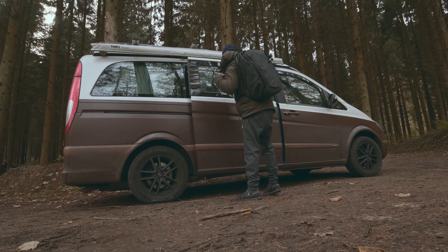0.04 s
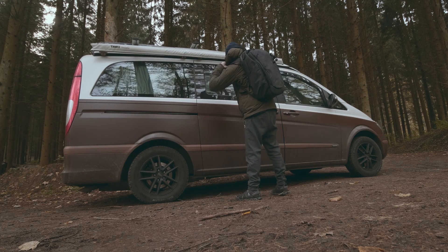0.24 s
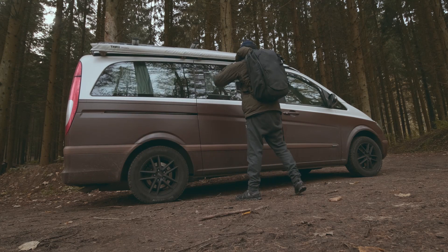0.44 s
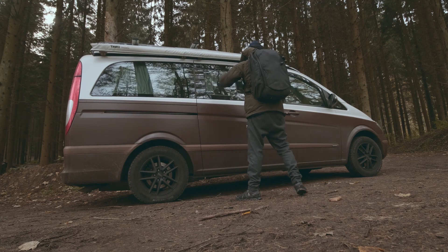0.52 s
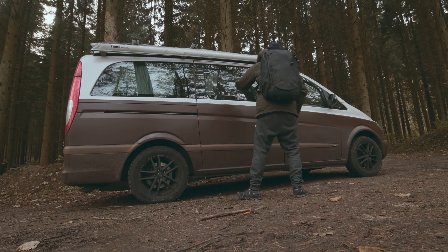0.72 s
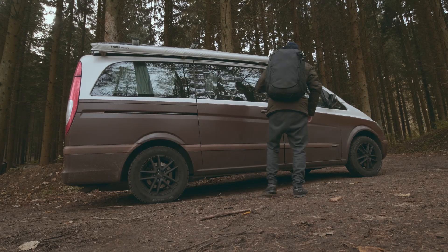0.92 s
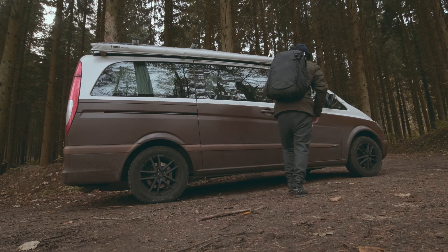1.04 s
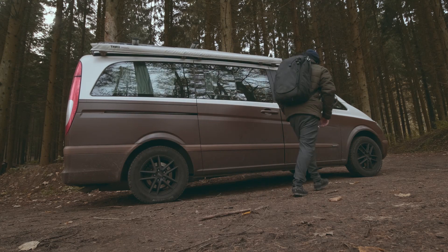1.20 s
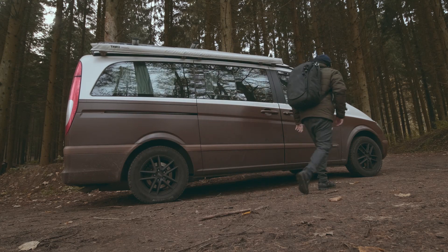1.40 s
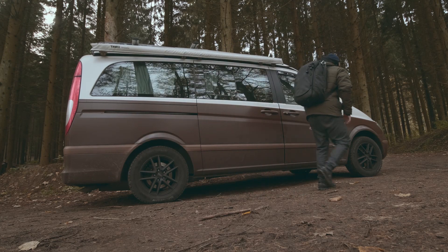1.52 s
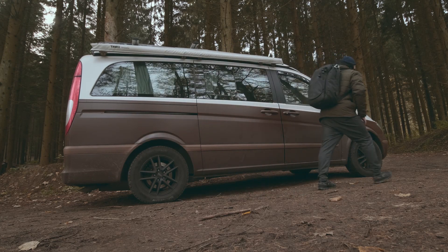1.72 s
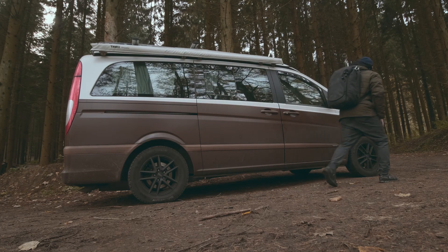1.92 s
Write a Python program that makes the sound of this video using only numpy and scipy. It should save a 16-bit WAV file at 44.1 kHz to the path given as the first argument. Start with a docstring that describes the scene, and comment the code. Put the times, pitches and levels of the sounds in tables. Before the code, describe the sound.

A van's sliding door rolls and slams shut, then faint footsteps cross dry forest litter.

```python
"""A van's side door rumbles along its rail on rollers, then slams in a still forest. The steel
panel booms against its frame, the latch snaps and rattles, and the pushed cabin air thuds.
Someone walks off over dry litter: soft footfalls, crackling scuffs and small twig snaps.
The trunks scatter a thin echo; under it all lie a faint hush of trees and a low wind rumble."""
import sys
import numpy as np
from scipy import signal
from scipy.fft import rfft, irfft
from scipy.io import wavfile
from scipy.ndimage import uniform_filter1d

SR = 44100
rng = np.random.default_rng(int(sys.argv[2]) if len(sys.argv) > 2 else 0)


def int16_out(signal):
    """Quantize to a 16-bit WAV file."""
    q = np.round(np.clip(np.atleast_2d(signal).T, -1, 1) * 32767)
    wavfile.write(sys.argv[1], SR, q.astype(np.int16))


N = 85995

# hush of the trees: (frequency [Hz], relative density [dB])
HUSH_COLOUR = [(60, 6.5), (150, 1.5), (230, 3.5), (330, 3), (600, -1.5), (1200, 0.5), (2000, -7),
               (3300, -8.5), (4100, -12.5), (5200, -17), (6500, -21.5), (11000, -21.5), (15000, -22)]
# wind rumble: (frequency [Hz], relative density [dB])
WIND_TONE = [(4, -9), (12, 13.5), (25, -8.5), (48, -2.5), (75, -7.5), (110, -34), (200, -29.5), (600, -136)]
# gusts: (time [s], level [dB])
GUSTS = [(0.5, -44), (0.544, -34), (0.802, -47.5), (0.854, -60), (0.916, -38), (0.956, -62), (0.996, -38),
         (1.056, -42), (1.096, -38.5), (1.166, -49), (1.25, -35), (1.314, -44), (1.368, -40), (1.73, -42),
         (1.836, -36), (1.95, -51)]
# echo off the trunks: (frequency [Hz], relative density [dB], t60 [s])
FOREST_TAIL = [(95, 19, 0.65), (410, -2, 0.54), (1200, -1.5, 0.58), (3160, -2.5, 0.69), (6850, -0.5, 0.59),
               (14400, -1, 0.26)]
# soles on soft ground: (time [s], level [dB], pitch [Hz], t60 [s])
STEPS = [(.983, -26.5, 48.7, 0.18), (1.072, -24.5, 46.3, 0.17), (1.365, -28, 42, 0.17)]
# shoes and clothing: (peak time [s], rise [s], fall [s], level [dB], tilt [dB/octave])
SCUFF_SWELLS = [(.04, 0.082, 0.045, -45.5, -2.5), (.135, 0.0055, 0.0072, -53, -4),
                (0.533, 0.024, 0.077, -50.5, -2), (.77, 0.091, 0.12, -50, -2),
                (1.29, 0.14, 0.13, -54, -1.5), (1.419, 0.038, 0.034, -50.5, -1),
                (1.535, .008, 0.011, -51.5, -6.5), (1.62, 0.07, 0.074, -58, 0.5),
                (1.797, 0.015, 0.016, -46, -2.5), (1.801, 0.014, 0.033, -48, 3),
                (1.899, .04, 0.061, -55.5, -1.5)]
# crackle of dry litter: (frequency [Hz], relative density [dB])
LITTER_COLOUR = [(40, -22), (150, -3), (400, 2), (1200, 0), (2200, -1), (3150, 3), (4000, -4), (5000, 0),
                 (6500, -10), (11000, -12), (15000, -18)]
# twigs and grit: (time [s], ring gain [dB], pitch [Hz], t60 [s], tick gain [dB])
TWIG_SNAPS = [(1.2298, -54, 4800, .005, -33), (1.2345, -51, 3500, 0.0055, -33),
              (1.2651, -44, 4570, 0.0038, -20), (1.269, -40, 2760, .005, -38),
              (1.31, -51.5, 3340, 0.057, -62), (1.397, -39, 2300, 0.012, -29.5),
              (1.426, -37.5, 2760, 0.013, -55), (1.798, -47.5, 4635, 0.08, -30),
              (1.919, -32, 4780, .013, -37)]
# ring of a twig: (frequency [multiple of its pitch], relative level [dB])
TWIG_MODES = [(.43, -5), (0.499, -8.5), (.88, -4), (.98, 0.5), (1.09, 0)]
# tick of a breaking fibre: (frequency [Hz], relative level [dB], t60 [s])
TICK_MODES = [(1840, -17.5, .004), (4700, 0.5, 0.0009), (8800, -15, 0.0011)]
# pushes of cabin air: (time [s], level [dB], pitch [Hz], t60 [s])
CABIN_THUDS = [(0.212, -6, 38.4, 0.32), (0.253, -0.5, 45, 0.086), (0.2669, -1, 117, 0.043),
               (0.297, -13, 52.4, 0.18)]
# drone of the hollow body: (frequency [Hz], level [dB], t60 [s])
CABIN_MODES = [(110, -28, .5), (128, -32, .45), (150, -29, .62), (163, -37, .45)]
# envelope of the rollers: (time [s], relative level [dB])
ROLL_ENVELOPE = [(0.0, -22), (0.044, -25.5), (0.064, -26.5), (0.102, -25), (0.184, -30), (0.19, -25.5)]
# roller rumble: (frequency [Hz], relative density [dB])
ROLL_TONE = [(40, -13), (90, -16.5), (170, 2), (330, -14), (500, -14.5), (780, -13), (1000, -26.5),
             (1250, -24), (1750, -38), (3200, -35.5), (5000, -48), (7000, -63), (15000, -64)]
# rail and door under the rollers: (frequency [Hz], relative level [dB], t60 [s])
RAIL_MODES = [(147.8, 8.5, 0.35), (160, -12, 0.18), (186, 0, 0.36), (228, -39, .1), (319, -1, 0.39),
              (590, -41, 0.089), (740, -41, 0.12), (1108, 1, 0.15)]
# latch strikes: (time [s], gain [dB], tilt [dB/octave])
LATCH_STRIKES = [(.2142, -26.5, -22), (.2165, -19, 4), (.2188, -24, 1.5), (0.2272, -27, 4), (0.249, -31, 6),
                 (0.2536, -22, -2), (.269, -38, 1), (.3022, -31, -3), (0.3255, -28.5, -9.5)]
# dense ring of latch steel: (frequency [Hz], relative density [dB], t60 [s])
STEEL_RING = [(150, -38, 0.063), (700, -19, 0.12), (1890, 4, 0.11), (3560, 4, 0.058), (3980, -0.5, 0.041),
              (5000, 3.5, 0.049), (6150, -9.5, 0.047), (9850, -11.5, .055), (15000, -23.5, 0.054)]
# clear notes of the catch: (frequency [Hz], relative level [dB], t60 [s])
CATCH_MODES = [(2194, -24.5, 0.046), (2690, -16, 0.026), (3458, -22.5, 0.084), (4800, -19, 0.078),
               (5590, -26, 0.062), (8170, -21, 0.056), (9970, -22, .04)]
# door on frame: (time [s], panel gain [dB], clatter gain [dB], tilt [dB/octave], seal t60 [s])
DOOR_BLOWS = [(0.204, -11, -10, 1, 1), (0.2097, -28.5, -16.5, 0, 1.2), (0.219, -21, -12.5, -2, 0.13),
              (0.2548, -28, -12.5, 0, 0.43), (.271, -30, -17.5, 0, 0.8), (.301, -33.5, -14.5, -2.5, 0.49),
              (0.311, -45, -17.5, -3, 0.27), (0.3278, -27, -12.5, -3, 0.075), (0.357, -39, -26, -4, 0.89)]
# boom of the panel: (frequency [Hz], relative level [dB], t60 without seals [s])
PANEL_MODES = [(183.2, -8, 0.94), (218, -0.5, 0.11), (331.8, -8, 0.79), (374.2, -9.5, 0.62),
               (478.2, -4, 0.18), (503, -5, 0.053), (566, -7.5, 0.25), (670, -17, 0.26), (750, -5, .2),
               (939, 5.5, 0.061), (1048, -4.5, 0.15), (1130, 4.5, 0.075), (1322, 5, 0.053),
               (1681, -9, 0.059)]
# clatter of the bodywork: (frequency [Hz], relative density [dB], t60 without seals [s])
BODY_RING = [(40, -28, 0.23), (103.4, -1.5, 0.31), (243, 0.5, .16), (540, 4, 0.15), (800, -1.5, 0.21),
             (1430, -2, 0.19), (1890, -26, 0.15), (3200, -25, 0.37), (6050, -39, 0.14), (15000, -58, 0.062)]

TIME = np.arange(N) / SR
BIN_OCTAVES = np.log2(np.fft.rfftfreq(N, 1 / SR) + 1)


def amp(db):
    """Decibels to gain."""
    return 10 ** (np.asarray(db) / 20)


def unit(x):
    """Scales to rms 1."""
    return x / np.sqrt(np.mean(x ** 2) + 1e-20)


def attack(rise_s):
    """A fade-in with time constant rise_s."""
    return 1 - np.exp(-TIME / rise_s)


def decay(t60):
    """An exponential fall of 60 dB in t60 seconds."""
    return np.exp(-np.log(1000) * TIME / t60)


def add(mix, start_s, sound):
    """Mixes a sound in at its cue."""
    part = mix[round(start_s * SR):]
    part += sound[:len(part)]


def colour(x, points, tilt_db=0):
    """EQs x to a curve, tilted by tilt_db per octave, at rms 1."""
    table = np.array(points)
    octaves = np.log2(table[:, 0])
    curve_db = np.interp(BIN_OCTAVES, octaves, table[:, 1] + tilt_db * octaves)
    return unit(irfft(rfft(x) * amp(curve_db), N))


def ring(table, tilt_db=0):
    """Countless close resonances: a noise burst whose bands die at their own speeds."""
    spectrum = rfft(colour(rng.standard_normal(N), table, tilt_db))
    hz, _, t60s = np.transpose(table)
    bands = [np.interp(BIN_OCTAVES, np.log2(hz), peak) for peak in np.eye(len(table))]
    return sum(irfft(spectrum * band, N) * decay(t60) for band, t60 in zip(bands, t60s))


def modes(table, tilt_db=0, wave=np.sin):
    """Decaying sines, tilted about the middle of the set."""
    middle = np.mean([np.log2(row[0]) for row in table])
    return sum(amp(db + tilt_db * (np.log2(hz) - middle)) * decay(t60) * wave(2 * np.pi * hz * TIME)
               for hz, db, t60 in table)


def grains(per_s, spread_db):
    """Random tiny impacts of uneven size."""
    hits = (rng.random(N) < per_s / SR) * rng.choice([-1, 1], N)
    return hits * amp(spread_db * np.minimum(rng.exponential(1, N), 4))


def thumps(table, rise_cycles=0.39):
    """Soft, deep pushes of air, each a quickly dying sine."""
    out = np.zeros(N)
    for start, db, hz, t60 in table:
        add(out, start, -attack(rise_cycles / hz) * modes([(hz, db, t60)]))
    return out


def air(hush_db=-52.5):
    """The bed: an even hush of trees and a lumpy wind rumble."""
    hush = amp(hush_db) * colour(rng.standard_normal(N), HUSH_COLOUR)
    gusts = amp(np.interp(TIME, *np.transpose(GUSTS)))
    return hush + gusts * colour(rng.standard_normal(N), WIND_TONE)


def forest_echo(x, wet_db=-21):
    """The trunks scatter a thin reverb tail."""
    tail = ring(FOREST_TAIL) * attack(rise_s=0.021)
    return amp(wet_db) * signal.fftconvolve(x, tail / np.linalg.norm(tail))[:N]


def footfalls():
    """Soles land on soft ground with a dull thump."""
    return thumps(STEPS)


def scuffs():
    """Swells of fine crackle from shoes on needles and from clothing."""
    out = np.zeros(N)
    for peak, rise, fall, db, tilt_db in SCUFF_SWELLS:
        width = np.where(TIME < peak, rise, fall)
        swell = amp(db) * np.exp(-((TIME - peak) / width) ** 2)
        out += swell * colour(grains(per_s=12000, spread_db=2.5), LITTER_COLOUR, tilt_db)
    return out


def snaps():
    """Twigs and grit break with a dry tick and a short woody ring."""
    out = np.zeros(N)
    for start, db, hz, t60, tick_db in TWIG_SNAPS:
        wood = modes([(hz * ratio, db + level, t60) for ratio, level in TWIG_MODES])
        add(out, start, amp(tick_db) * modes(TICK_MODES) + attack(rise_s=0.0004) * wood)
    return out


def rollers(rumble_db=-1.5, drone_db=-12, stop_s=0.199, release_s=0.02):
    """Small bumps of the rail shake the door until it reaches the frame."""
    bumps = grains(per_s=1000, spread_db=3.5)
    rumble = colour(grains(per_s=14000, spread_db=3.5), ROLL_TONE)
    drone = unit(irfft(rfft(bumps) * rfft(modes(RAIL_MODES, wave=np.cos)), N))
    level = amp(np.interp(TIME, *np.transpose(ROLL_ENVELOPE)))
    release = np.exp(-np.maximum(TIME - stop_s, 0) / release_s)
    return level * release * (amp(rumble_db) * rumble + amp(drone_db) * drone)


def cabin(drone_start_s=0.26):
    """The slam's low end: trapped air thuds, and the hollow body drones on."""
    out = thumps(CABIN_THUDS)
    add(out, drone_start_s, attack(rise_s=0.008) * modes(CABIN_MODES))
    return out


def latch(chatter_rms_db=2, chatter_s=0.00085):
    """The slam's bright edge: steel catches strike, chatter and ring."""
    out = np.zeros(N)
    for start, db, tilt_db in LATCH_STRIKES:
        chatter = unit(uniform_filter1d(rng.standard_normal(N), round(chatter_s * SR)))
        rattle = amp(chatter_rms_db * chatter) * ring(STEEL_RING, tilt_db)
        add(out, start, amp(db) * (rattle + modes(CATCH_MODES, tilt_db)))
    return out


def door_slam():
    """The panel hits the frame, is pulled home and rocks; the seals damp it."""
    out = np.zeros(N)
    for start, panel_db, clatter_db, tilt_db, seal_t60 in DOOR_BLOWS:
        boom = amp(panel_db) * modes(PANEL_MODES, tilt_db)
        clatter = amp(clatter_db) * ring(BODY_RING, tilt_db)
        add(out, start, attack(rise_s=0.0011) * decay(seal_t60) * (boom + clatter))
    return out


def scene():
    """The mono mix: door and litter feed the echo; cabin, footfalls and bed stay dry."""
    near = rollers() + door_slam() + latch() + scuffs() + snaps()
    return (near + forest_echo(near) + cabin() + footfalls() + air())[None]


def record(dry):
    """Soft saturation rounds the slam; a low-pass trims the very top."""
    ceiling, cutoff_hz = 1.4, 15800
    soft = ceiling * np.tanh(dry / ceiling)
    lowpass = signal.firwin(511, cutoff_hz, window=("kaiser", 9), fs=SR)
    return signal.oaconvolve(soft, lowpass[None], "same")


dry = scene()
out = record(dry)
int16_out(out)
```